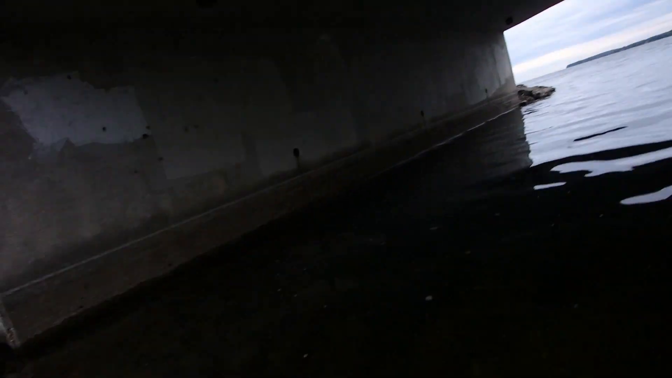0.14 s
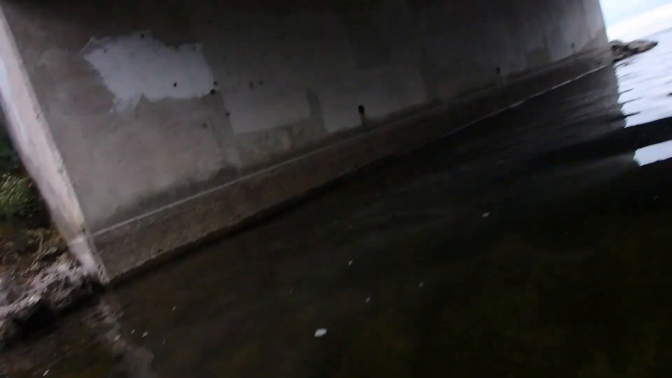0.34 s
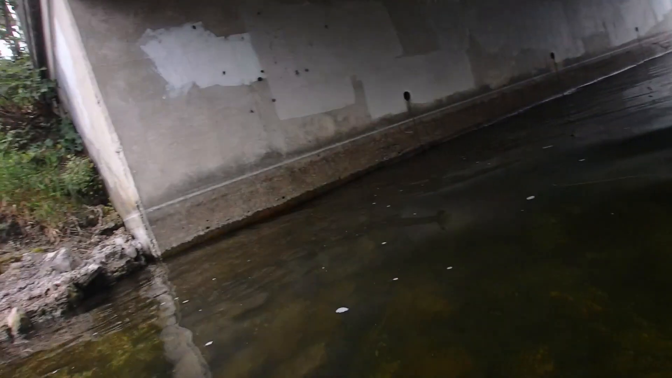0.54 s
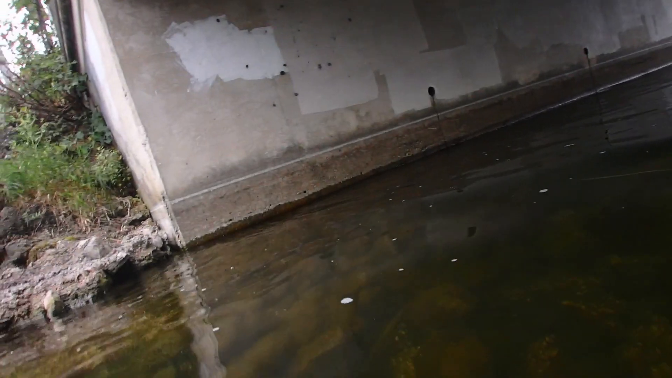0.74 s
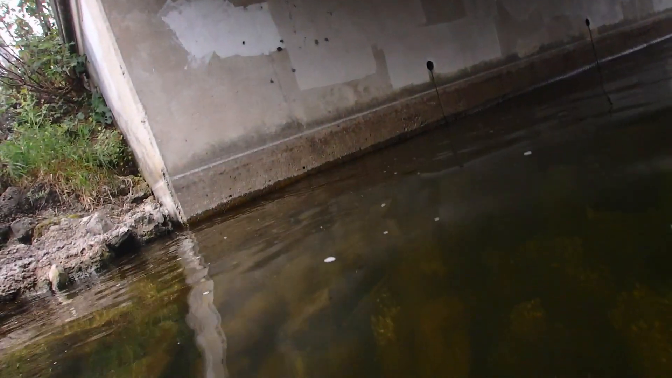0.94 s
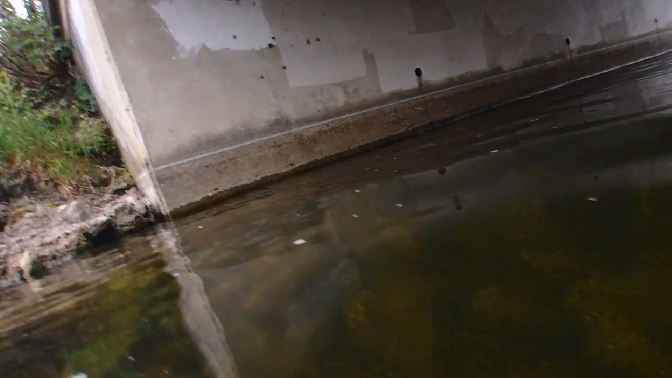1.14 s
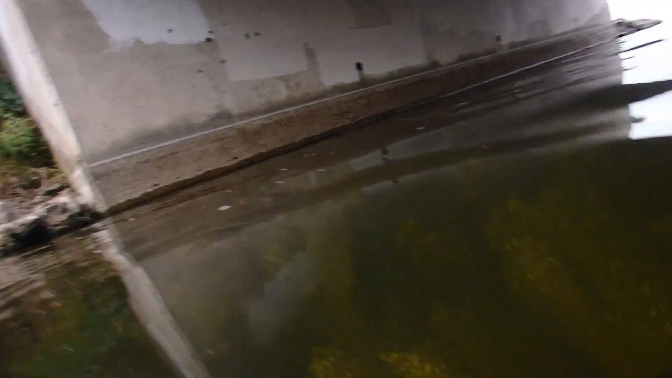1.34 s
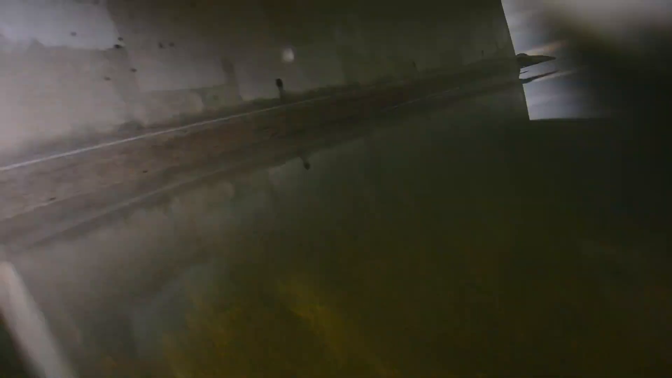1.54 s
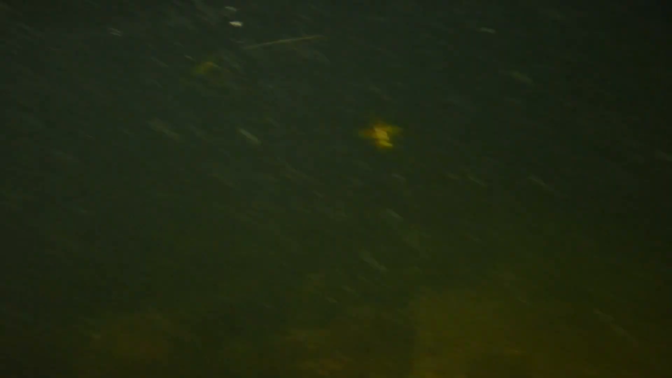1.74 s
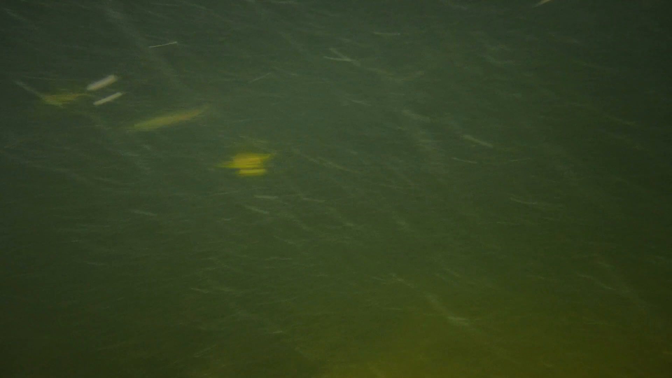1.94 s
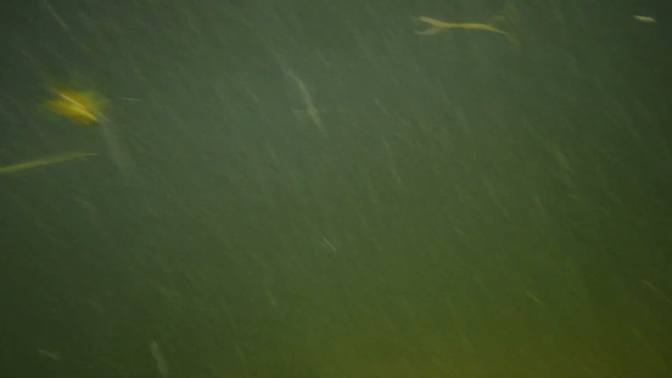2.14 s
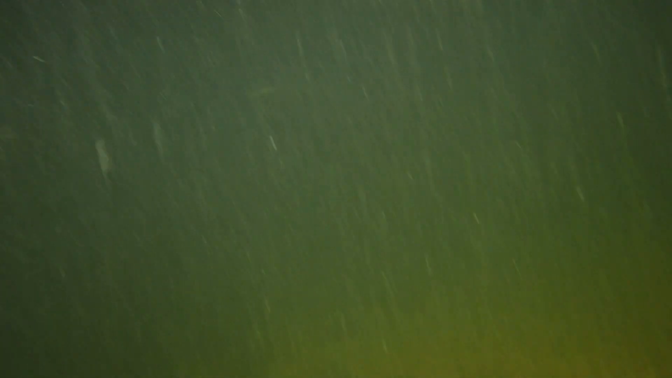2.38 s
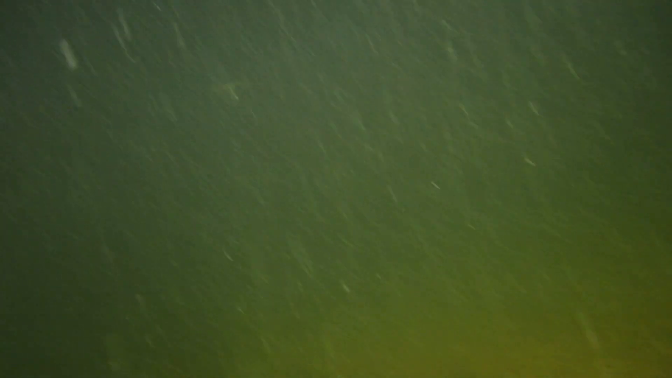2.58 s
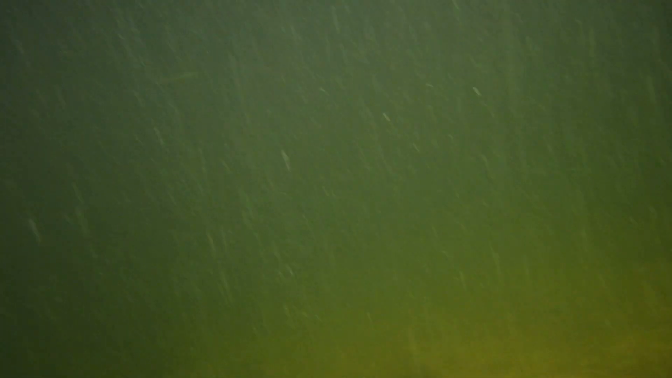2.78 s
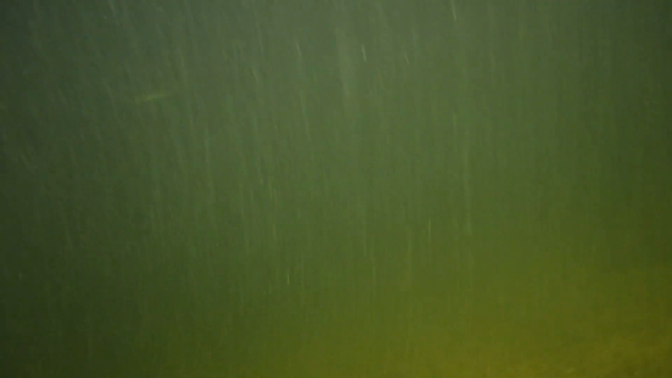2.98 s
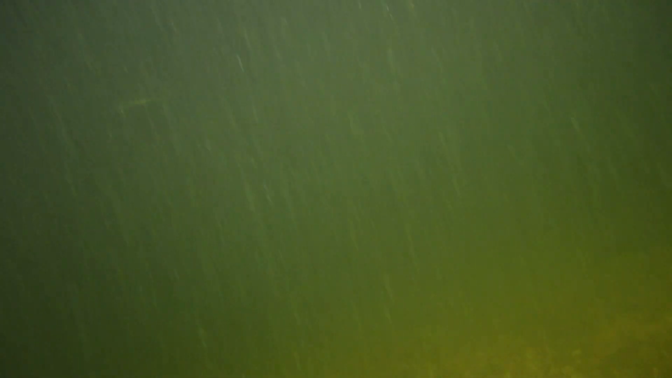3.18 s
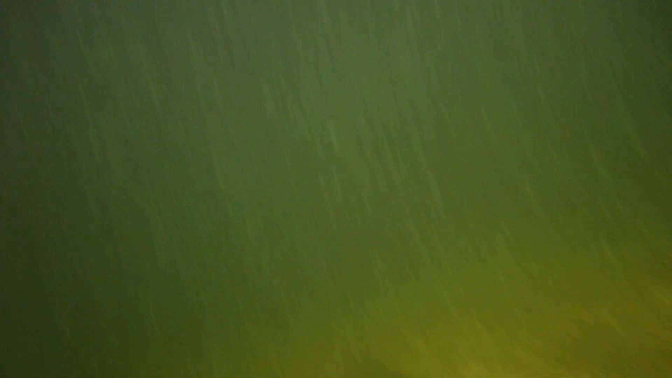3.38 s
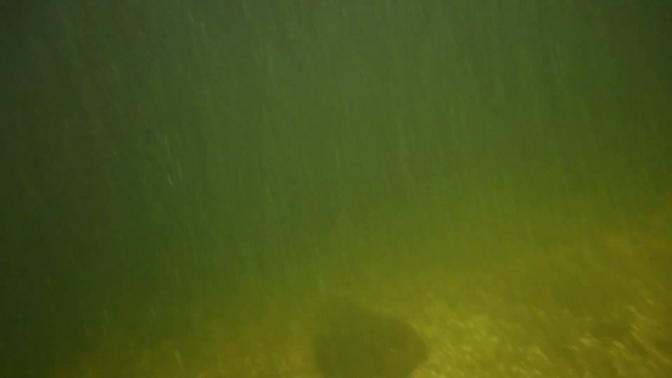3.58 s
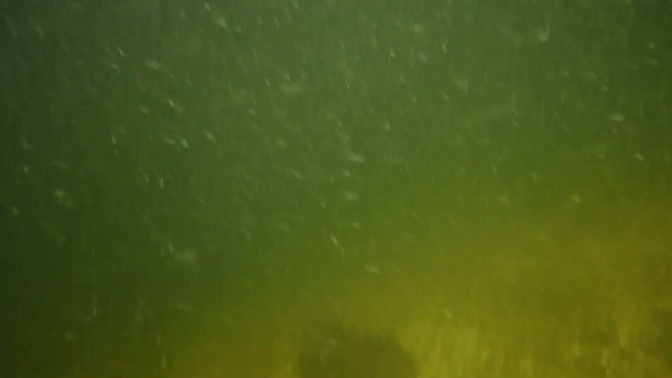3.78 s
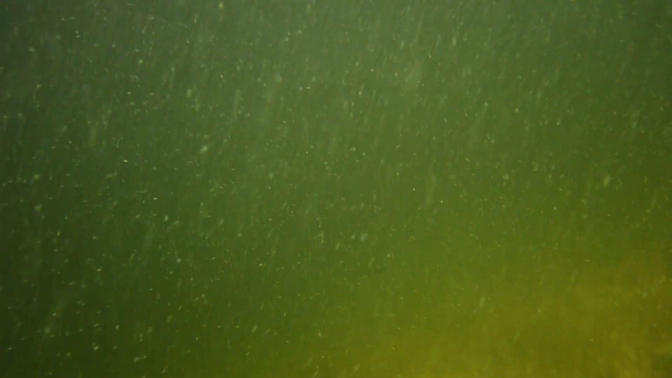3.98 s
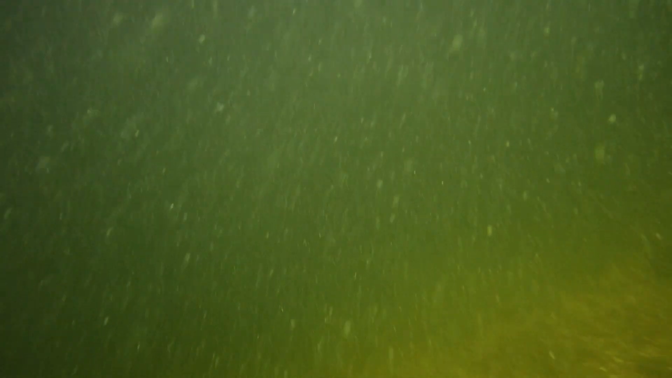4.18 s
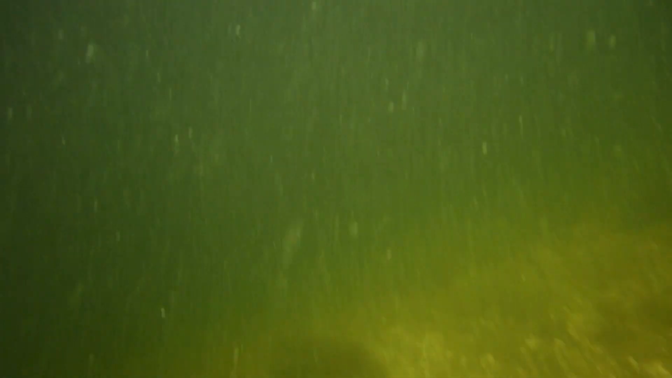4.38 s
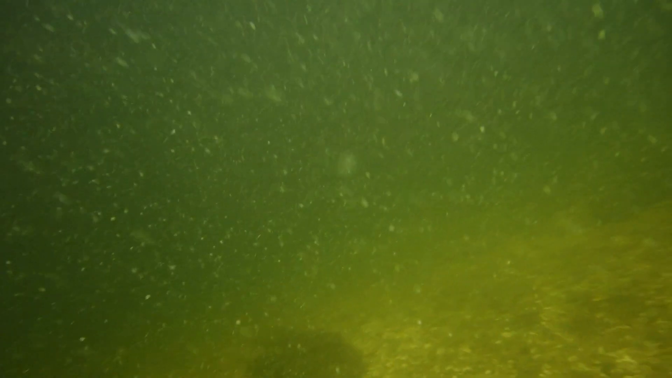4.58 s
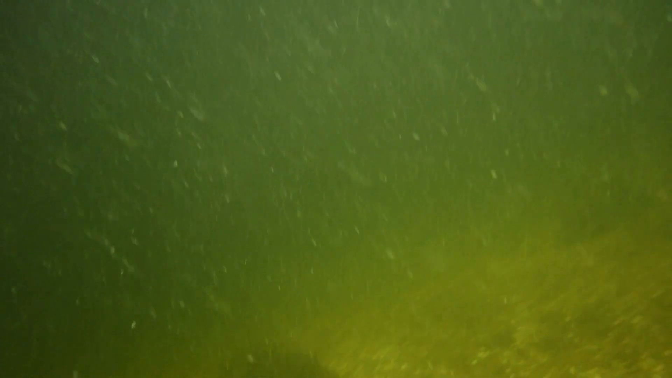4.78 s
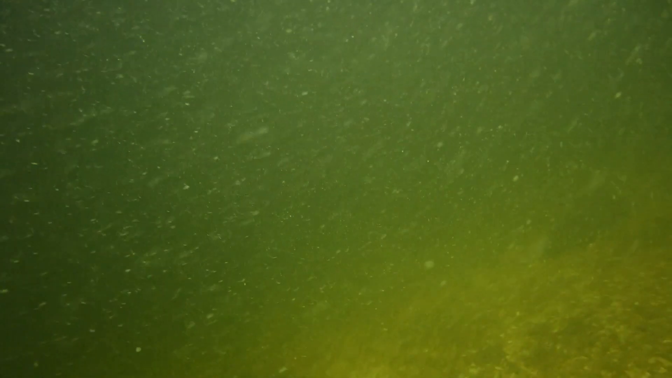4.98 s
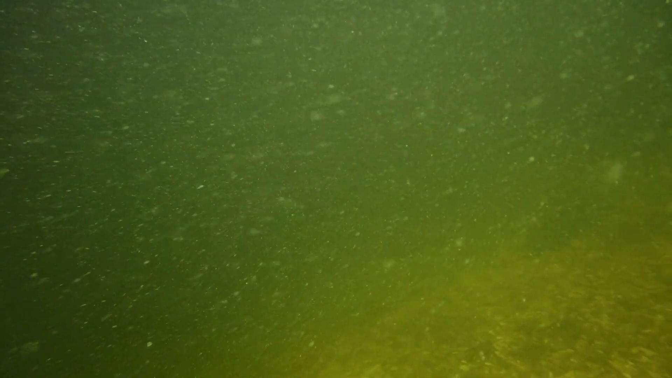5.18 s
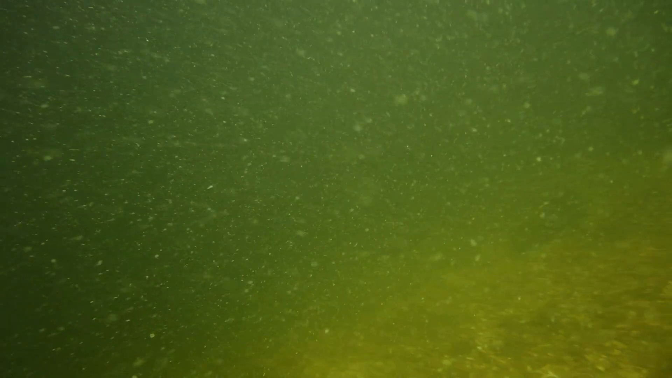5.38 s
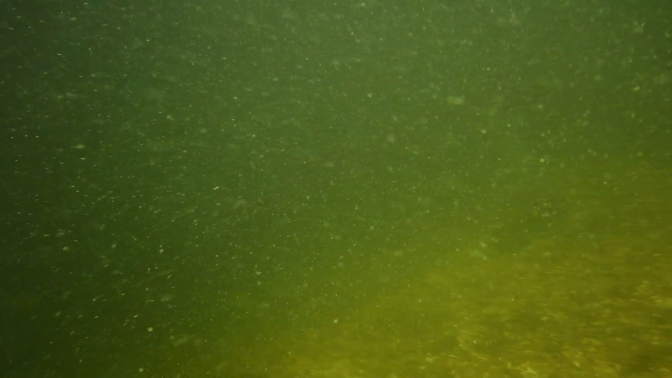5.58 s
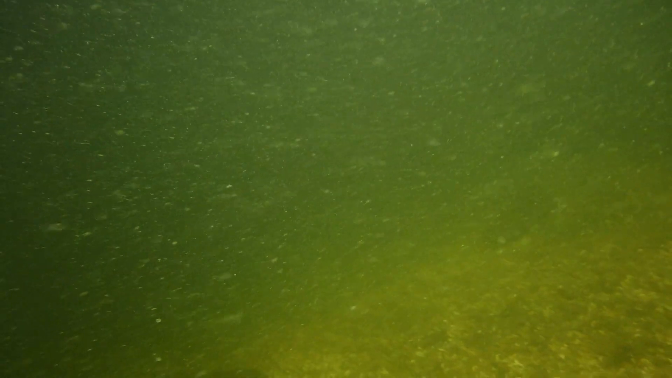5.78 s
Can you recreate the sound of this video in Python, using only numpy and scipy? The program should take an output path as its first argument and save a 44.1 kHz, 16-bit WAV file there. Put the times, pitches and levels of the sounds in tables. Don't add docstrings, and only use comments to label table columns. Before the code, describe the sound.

A small handheld camera over a lake beneath a bridge catches low wind thumps on both microphones, faint shore hiss, a few drips and two tiny insect chirps. It plunges in with hissing spray, hard slaps, snaps and a rising gulp. Underwater, muffled bubbles blub mostly on the left, with soft groans, ticks and plinks.

```python
import sys
import numpy as np
from scipy import signal
from scipy.fft import rfft, irfft, next_fast_len
from scipy.io import wavfile
from scipy.ndimage import uniform_filter1d, map_coordinates

SR = 44100
rng = np.random.default_rng(int(sys.argv[2]) if len(sys.argv) > 2 else 0)


def put_to_file(sound):
    columns = np.atleast_2d(sound).T
    safe = np.clip(columns, -1, 1)
    whole_steps = np.round(safe * 32767)
    wavfile.write(sys.argv[1], SR, whole_steps.astype(np.int16))


def linear_from_db(decibels):
    return 10 ** (np.asarray(decibels, float) / 20)


N = 257103
TIME = np.arange(N) / SR

# (time [s], gain [dB], gurgle level [dB], left over right [dB])
GAIN = [
    (1.853, 7.5, -38.5, 4.5),
    (2.2, -0.5, -34, 1.5),
    (2.7, 4, -36.5, 1),
    (3.2, 7, -39, 1),
    (3.7, 14.5, -39.5, 6.5),
    (4.3, 18.5, -38.5, 4),
    (4.9, 24, -40, 6),
    (5.55, 26, -35.5, 9.5),
    (5.83, 21, -40, 6),
]


def unit(x):
    return x / np.sqrt(np.mean(x ** 2) + 1e-20)


def curves(rows):
    s, *columns = np.transpose(rows)
    gate = uniform_filter1d(1. * ((TIME >= s[0]) & (TIME <= s[-1])), size=60)
    return [np.interp(TIME, s, column) for column in columns] + [gate]


def sides(pan_db):
    left = 1 / (1 + linear_from_db(-2 * np.asarray(pan_db)))
    return np.sqrt(2 * np.array([left, 1 - left]))


def surges(rows, rest_db):
    power = linear_from_db(2 * rest_db)
    for s, half, db, *pan in rows:
        bell = np.exp(-((TIME - s) / half) ** 2)
        power = power + linear_from_db(2 * db) * np.outer(sides(sum(pan)) ** 2, bell)
    return np.sqrt(power)


def wobble(rate):
    knots = rng.standard_normal((2, 4000))
    return np.array([map_coordinates(k, [np.arange(N) * min(rate, 600) / SR]) for k in knots])


def filtered(x, response):
    m = next_fast_len(N + SR // 2)
    return irfft(rfft(x, m) * response(np.fft.rfftfreq(m, 1 / SR)), m)[..., :N]


def resonant(modes):
    def response(f):
        total = 0
        for k, (c, w, db) in enumerate(modes):
            total = total + (-1) ** k * linear_from_db(db) * 1j * f * w / (c * c - f * f + 1j * f * w + 1e-9)
        return total
    return response


def rush(spectrum, alike, lump_db, lump_rate):
    f, db = np.transpose(spectrum)
    a, b = rng.standard_normal((2, N))
    turn = np.arccos(np.clip(alike, -1, 1)) / 2
    pair = np.cos(turn) * a + np.sin(turn) * np.array([b, -b])
    lumps = wobble(lump_rate)
    pair = pair * linear_from_db(lump_db * (lumps + np.clip(alike, 0, 1) * lumps[::-1]))
    return unit(filtered(pair, lambda hz: linear_from_db(np.interp(np.log(hz + 1), np.log(f), db))))


def hiss(spectrum, alike):
    return rush(spectrum, alike, 0, 1)


def scrape(t60, alike):
    a, b, c = rng.standard_normal((3, 600))
    return (alike * a + (1 - alike) * np.array([b, c])) * linear_from_db(-60 * np.arange(600) / SR / t60)


def blip(hz, cycles, rise):
    turns = np.arange(2000) / SR * hz
    u = turns / max(cycles, .2)
    return -np.sin(2 * np.pi * turns * (1 + rise * np.minimum(u, 2))) * (u * np.exp(1 - u)) ** 1.73


def add(out, s, sound):
    at = round(s * SR)
    out[:, at:at + sound.shape[1]] += sound[:, :N - at]


def place(out, s, db, pan_db, sound):
    add(out, s, linear_from_db(db) * np.outer(sides(pan_db), sound))


def wind():
    # (frequency [Hz], level per Hz [dB])
    buffet = [(12, -45.5), (20, -9), (54, -1), (141, -0.5), (334, -9.5), (500, -33), (650, -46),
              (1100, -120)]
    whip = [(150, -37.5), (250, -1.5), (510, -7), (1610, -38.5), (2000, -62), (2600, -90.5), (4400, -120)]
    # (centre [s], half length [s], level [dB], left over right [dB])
    gusts = [(0, 0.14, -23, 5), (.33, 0.059, -16.5, 6), (.41, 0.036, -28, -10), (.55, 0.056, -28, -5),
             (.77, 0.15, -20, -11.5), (1.04, 0.052, -17, -5.5), (1.12, 0.018, -13, 2.5),
             (1.24, 0.055, -14, -1), (1.31, 0.032, -27, -9), (1.4, 0.086, -16.5, 2.5),
             (1.53, 0.087, -13, 6.5)]
    noise = rush(buffet, alike=0.29, lump_db=-1.5, lump_rate=35)
    noise += linear_from_db(-11) * rush(whip, alike=.1, lump_db=3.5, lump_rate=60)
    return surges(gusts, rest_db=-32) * noise


def shore():
    # (frequency [Hz], level per Hz [dB])
    air = [(590, -17.5), (1000, -3), (1400, -10), (1610, -9.5), (2010, -12), (2410, -13), (3010, -17.5),
           (3270, -6.5), (3980, -17), (4360, -13.5), (5200, -16.5), (5900, -12.5), (6500, -18), (9000, -20),
           (14600, -28.5), (16000, -33)]
    return linear_from_db(-50) * hiss(air, alike=0.61)


def finger_brush():
    # (start [s], length [s], level [dB])
    rustle = (0.0069, 0.042, -38.5)
    start, length, db = rustle
    spectrum = [(1000, -2.5), (2500, -6.0), (3500, 2.5), (6000, -11), (8000, -19), (12000, -87)]
    swell = np.exp(-((TIME - start - length / 2) / (length / 2)) ** 4)
    return linear_from_db(db) * swell * rush(spectrum, alike=0.8, lump_db=4.5, lump_rate=190)


def eddies():
    # (time [s], peak [dB], pitch [Hz], left over right [dB])
    bumps = [
        (0.291, 0, 89, 11),
        (0.877, -14, 374, -17),
        (1.034, -5, 296, -12),
        (1.233, -7, 109, -19),
        (1.485, -4.5, 340, 4),
    ]
    out = np.zeros((2, N))
    for s, db, hz, pan_db in bumps:
        place(out, s, db, pan_db, blip(hz, 0.33, rise=-0.017))
    return out


def drops():
    # (time [s], peak [dB], pitch [Hz], left over right [dB], length [cycles])
    falls = [
        (.661, -37.5, 5650, -8, 2.3),
        (.78, -37, 1600, 2, 2.8),
        (.857, -40, 3400, 0, 4.3),
        (.862, -29, 7500, -8.5, 1.6),
        (.924, -41, 2450, -1, 3.7),
    ]
    out = np.zeros((2, N))
    for s, db, hz, pan_db, cycles in falls:
        place(out, s, db, pan_db, blip(hz, cycles, rise=0.016))
    return out


def insect():
    # (time [s], length [s], start pitch [Hz], end pitch [Hz], level [dB])
    chirps = [
        (1.057, 0.06, 6300, 7000, -54),
        (1.23, 0.072, 6650, 7290, -50),
    ]
    out = np.zeros((2, N))
    for s, length, from_hz, to_hz, db in chirps:
        u = np.arange(int(length * SR)) / (length * SR)
        hz = to_hz + (from_hz - to_hz) * np.exp(-3.5 * u) + 70 * wobble(450)[0, :len(u)]
        flutter = 1 + 0.37 * np.cos(2 * np.pi * 40 * u * length - 1.2)
        tone = np.sin(2 * np.pi * np.cumsum(hz) / SR)
        add(out, s, sides(-7)[:, None] * linear_from_db(db) * np.sin(np.pi * u) ** 0.57 * flutter * tone)
    return out


def above():
    ports_dry = uniform_filter1d(1. * (np.arange(N) < 1.61 * SR), size=400)
    return ports_dry * (wind() + shore()) + finger_brush() + eddies() + drops() + insect()


def churn_and_spray():
    # (time [s], churn level [dB], left over right [dB])
    entry = [
        (1.603, -36, 16),
        (1.622, -19.5, 6),
        (1.65, -10.5, -3),
        (1.668, -25, 0),
        (1.776, -30, -4),
        (1.79, -11, 7),
        (1.796, -35, 3),
        (1.802, -44, 5),
        (1.804, -18.5, 12),
        (1.8195, -14.5, 13),
    ]
    # (frequency [Hz], level per Hz [dB])
    churn_spectrum = [(30, -20), (100, -2.5), (500, -18), (1100, -17), (2400, -35.5), (3300, -36.5),
                      (4400, -50), (8000, -70.5), (14000, -100)]
    spray_spectrum = [(500, -3), (1500, -6), (2800, -4.5), (6500, -9), (10600, -19.5), (16000, -30.5)]
    churn_db, pan_db, gate = curves(entry)
    peak_s, wetted_s = 1.61, 1.656
    spray_db = -24.5 - 20 * np.maximum(peak_s - TIME, 0) / 0.0029
    spray_db -= 400.5 * np.clip(TIME - peak_s, 0, wetted_s - peak_s)
    spray_db += -28.5 * (TIME > wetted_s)
    churn = linear_from_db(churn_db) * sides(pan_db) * rush(churn_spectrum, alike=.2, lump_db=5.5, lump_rate=200)
    spray = linear_from_db(spray_db) * rush(spray_spectrum, alike=.4, lump_db=6, lump_rate=300)
    return gate * (churn + spray)


def slaps():
    # (time [s], peak [dB], pitch [Hz], left over right [dB], length [cycles])
    hits = [(1.6448, -5, 570, 5.5, 1.3), (1.6555, -10, 165, 2, 1.26), (1.6792, -4.5, 440, 2, 1.2),
            (1.7236, -16, 403, -13, 1.3), (1.7408, -8, 350, -1, 1.5), (1.6843, -21, 450, 0, 1.3),
            (1.693, -22, 1000, 3, 1.8), (1.693, -40.5, 3300, 2, 4.5), (1.723, -20, 1980, -11.5, 2.2),
            (1.733, -18, 980, -3.5, 2.6), (1.7588, -28, 2430, 0, 3.5), (1.7728, -26, 1500, 1, 2),
            (1.699, -23, 86, 2.5, 2.1), (1.748, -22, 95, 2, 1.5), (1.604, -16.5, 160, 6.5, 0.98),
            (1.7795, -13, 1354, 5.5, 3), (1.7845, -11, 1200, 21.5, 5), (1.8025, -11, 700, 18, 0.8),
            (1.8129, -7, 761, 23, 1.1), (1.8318, -3.5, 810, 19, 0.4)]
    out = np.zeros((2, N))
    for s, db, hz, pan_db, cycles in hits:
        place(out, s, db + 1.5, pan_db, blip(hz, .52 * cycles, rise=-.18))
    return out


def film_snaps():
    # (time [s], peak [dB])
    tears = [(1.6095, -1), (1.6173, -15.5), (1.6236, -26), (1.6274, -18.5), (1.6503, -25), (1.6614, -28),
             (1.6895, -34.5), (1.7428, -41), (1.7537, -41.5), (1.787, -28.5), (1.8035, -37.5),
             (1.8140, -31), (1.8192, -26), (1.8254, -46.5), (1.8318, -24.5)]
    snaps = np.zeros((2, N))
    onset = np.minimum(np.arange(600) / 45, 1)
    for s, db in tears:
        add(snaps, s, linear_from_db(db - 1) * sides(3)[:, None] * scrape(t60=.007, alike=.4) * onset * 1.5)
    return filtered(snaps, resonant([(10300, 2800, -4), (6500, 1300, 1), (3500, 2600, -7)]))


def gulp():
    # (start [s], length [s], start pitch [Hz], end pitch [Hz], level [dB], change over its length [dB])
    quickening = (1.6232, .022, 230, 1150, -5, -9)
    s, length, from_hz, to_hz, db, fade_db = quickening
    out = np.zeros((2, N))
    u = np.arange(int(length * SR)) / (length * SR)
    turns = np.cumsum(from_hz * (to_hz / from_hz) ** (u ** 1.3)) / SR
    saw = uniform_filter1d(turns % 1 * 2 - 1, size=14, mode="constant")
    add(out, s, sides(14 - 22 * u) * linear_from_db(db + fade_db * u) * saw * np.minimum(1, 8 * (1 - u)))
    return out


def port_seals():
    # (time [s], level [dB], left over right [dB], push 1 or pull -1)
    steps = [
        (1.791, -4.5, -26, -1),
        (2, -7, 24, -1),
        (1.8185, 0, 25, 1),
        (1.8247, -1, -20, 1),
        (1.8326, -12, 24, 1),
    ]
    out, t = np.zeros((2, N)), np.arange(900) / SR
    settling = np.exp(-t / 0.0018) * np.cos(2 * np.pi * 124 * t) * (1 - np.exp(-t / 0.00023)) ** 2
    for s, db, pan_db, sign in steps:
        place(out, s, db, pan_db, np.sign(sign) * settling)
    return out


def groan():
    # (frequency [Hz], level per Hz [dB])
    groan_spectrum = [(70, 9), (100, 8.5), (120, 19), (138, 14.5), (152, 5.5), (200, -56)]
    sway_spectrum = [(15, 7.5), (30, 9), (60, 7.5), (100, 9.5), (200, -64)]
    # (centre [s], half length [s], level [dB])
    swings = [(1.86, 0.053, -40.5), (2.3, 0.056, -42.5), (2.58, 0.035, -33), (2.81, 0.045, -29.5),
              (2.93, .04, -42), (3.0, 0.18, -46), (3.3, 0.06, -34.5), (3.55, 0.1, -33.5), (3.98, 0.09, -30),
              (4.41, 0.045, -28.5), (5.77, 0.038, -44)]
    # (centre [s], half length [s], level [dB], pitch [Hz], glide [Hz/s])
    moans = [
        (3.3, 0.066, -30.5, 117.2, -120),
        (3.601, .07, -33.5, 121.6, -200),
        (3.98, 0.064, -24, 122.5, -29),
        (4.082, 0.047, -30.5, 81, 58),
        (4.4, 0.046, -28, 125, 20),
        (4.39, 0.046, -31, 78.5, 300),
    ]
    rest_db = -45.5
    swing = surges(swings, rest_db)
    smeared = uniform_filter1d(swing, SR) / linear_from_db(rest_db)
    sway = linear_from_db(-47.5 + 0.2 * curves(GAIN)[0]) * smeared ** 0.82
    low = swing * hiss(groan_spectrum, alike=0.96)
    low += sway * rush(sway_spectrum, alike=0.96, lump_db=3.5, lump_rate=10)
    for s, half, db, hz, glide in moans:
        t = TIME - s
        low += linear_from_db(db) * np.exp(-(t / half) ** 2 / 2) * np.sin(2 * np.pi * t * (hz + glide * t / 2))
    return low


def water_rush():
    # (frequency [Hz], level per Hz [dB])
    flow_spectrum = [(400, -10.5), (700, -0.5), (920, -8.5), (1080, -3.5), (1400, -14), (1650, -6.5),
                     (1850, -5.5), (2150, -13.5), (2500, -19), (2850, -31.5), (3270, -22.5), (4300, -35),
                     (5300, -47), (8000, -79), (12000, -110)]
    cavity_whine = [(900, -43.5), (1040, -2.5), (1080, 4.5), (1120, -0.5), (1300, -48)]
    gain_db, _, pan_db, _ = curves(GAIN)
    flow = rush(flow_spectrum, alike=0.46, lump_db=2.3, lump_rate=150)
    flow += 0.5 * sides(5.2)[:, None] * rush(cavity_whine, alike=0.091, lump_db=1.0, lump_rate=33)
    return flow * linear_from_db(-59 + gain_db) * sides(0.91 * pan_db)


def circuit_hiss():
    # (frequency [Hz], level per Hz [dB])
    circuit = [(2940, -29), (5000, -2.5), (6100, -16), (8380, -7), (13500, -5), (16000, -17.5)]
    lift_db = np.maximum(curves(GAIN)[0], 1.5) * (TIME > 2)
    return linear_from_db(-87.5 + lift_db) * hiss(circuit, alike=0.21)


def froth(count):
    out = np.zeros((2, N))
    for when, pitch, life, size, side in rng.random((count, 5)):
        lowest_hz = 170 if side < .4 else 285
        swing = blip(lowest_hz * 2.25 ** pitch, .5 + 0.72 * life, rise=0.036)
        place(out, 1.86 + 3.97 * when ** 1.5, -4 * np.log(size + 0.069), 24 * (side - .5), swing)
    return unit(out)


def gurgle():
    # (frequency [Hz], level per Hz [dB])
    gurgle_spectrum = [(70, -42), (130, 6.5), (430, -5), (900, -13), (1700, -26), (3200, -35.5),
                       (5000, -64), (8000, -110)]
    _, gurgle_db, pan_db, _ = curves(GAIN)
    mixed = .75 * rush(gurgle_spectrum, alike=.3, lump_db=5.5, lump_rate=90) + 0.56 * froth(count=520)
    return linear_from_db(gurgle_db) * sides(0.75 * pan_db) * mixed


def water():
    submerged = curves(GAIN)[-1]
    return submerged * (groan() + water_rush() + circuit_hiss() + gurgle())


def bubbles():
    # (time [s], peak [dB], pitch [Hz], left
    # over right [dB], length [cycles])
    air_bubbles = [(1.857, -22, 414, 11.5, 0.87), (1.886, -15.5, 328, 26, 0.38), (2.054, -17, 430, 20, 0.51),
                   (2.1, -11, 352, 15.5, 0.58), (2.2, -21, 320.1, 0, 0.75), (2.228, -23.5, 367, 16.5, 0.8),
                   (2.29, -24, 504, 19, 2.8), (2.403, -19, 385, 5, 1), (2.42, -23, 429, 15, 2),
                   (2.461, -20, 370, 5, 1), (2.495, -16.5, 587, -18, 1.17), (2.549, -22, 435, 3.5, 1.9),
                   (2.578, -22.5, 436, -14, 1.35), (2.647, -20, 448.5, 11, 4.4), (2.744, -19, 417, 6, 2),
                   (2.778, -22.5, 460, 6.5, 2), (2.846, -15, 410, 5.5, 1.17), (2.901, -18.5, 464, 11, 2),
                   (2.9161, -18.5, 408, -3, 1.05), (2.888, -23, 476, 4, 1), (2.923, -20.5, 434, 3.5, 1.14),
                   (2.95, -17.5, 395, 3, 1.35),
                   (3.0465, -17, 400, 2, 1.76), (3.068, -26, 520, 7, 2.1), (3.096, -17, 340, -14, 3),
              (3.1655, -16.5, 356, 7, 1.3), (3.3452, -16, 320, 1, 0.68), (3.445, -17, 600, 24, 0.65),
              (3.491, -24.5, 383, 7, 2.4), (3.563, -16.5, 582, 16, 1.4), (3.59, -24, 557, 22, 1.5),
              (3.711, -15, 479, 7, 1.34), (3.754, -17, 342, 5.5, 1.25), (4.021, -20, 302.7, -11, 2.1),
              (4.048, -13.5, 347, 10, 0.53), (4.259, -9.5, 395, 7, 0.81), (4.508, -10.5, 404, 7, 0.88),
              (4.838, -6.5, 405, 7, 0.72), (5.568, -5, 624, 30, 0.78), (5.737, -14.5, 420, -1, 1.46),
              (5.749, -6, 372, 13, 0.88), (5.76, -11.5, 510, 9, 1),
                   (1.919, -26.5, 570, -5, 1.5), (1.963, -31, 329, 18, 0.93), (2.015, -25, 380, 9, 1.1),
             (2.16, -25.5, 450, 10, 1.5), (2.238, -22, 300, -0.5, 0.96), (2.259, -25.5, 240, 1, 1.1),
             (2.336, -33, 600, 8, 1.6), (2.356, -23.5, 418, 4.5, 1.36), (2.37, -27, 520, 4, 2),
             (2.62, -35, 550, 9, 1.25), (2.707, -36, 520, 8, 1.2), (2.8045, -24, 380, 7, 1.14),
             (3.148, -22, 452, -1, 0.73), (3.242, -34, 558, 9, 1.3), (3.263, -29, 500, 6, 1.1),
             (3.318, -23.5, 354, 4, 1.6), (3.383, -28, 260, -3, 0.89), (3.53, -30.5, 700, 12, 1.5),
             (3.681, -30, 300, 4, 0.72), (3.819, -27.5, 750, 4, 1.5), (3.853, -27, 500, 8, 0.66),
             (3.995, -26, 700, 9, 0.9), (3.493, -22.5, 238, 1, 1.2), (3.56, -19.5, 270, 3, 0.8),
             (3.711, -17.5, 228, 5.5, 1.3), (5.751, -15, 212, 7, 2.1), (5.572, -13, 815, 20, 0.97)]
    # (time [s], peak [dB])
    seam_leak = [
        (4.572, -12.5),
        (4.774, -10),
        (4.927, -13),
        (5.038, -10.5),
        (5.141, -10),
        (5.239, -9.5),
        (5.338, -9.5),
        (5.442, -10.5),
        (5.548, -10),
        (5.652, -12.5),
    ]
    out, t = np.zeros((2, N)), np.arange(1800) / SR
    gain_db = curves(GAIN)[0]
    loose = [(*row, -32 + 0.3 * gain_db[round(row[0] * SR)]) for row in air_bubbles]
    leak = [(s, db, 510, 13.5, 1.61, -10.5) for s, db in seam_leak]
    for s, db, hz, pan_db, cycles, knock_db in loose + leak:
        left, right = linear_from_db(db + 3.5) * sides(pan_db)
        near = blip(hz, 0.5 * cycles, rise=0.026)
        far = blip(0.546 * hz, 0.75 * cycles, rise=0.036)
        pop = np.array([left * near, right * (0.64 * near + 0.48 * far)])
        add(out, s, pop)
        burble = rng.standard_normal((2, 1800)) * linear_from_db(-60 * t / 0.033) * (t > .004)
        add(out, s, linear_from_db(-6) * signal.fftconvolve(pop, burble / np.linalg.norm(burble[0]), axes=1))
        knock = blip(1780 + 60 * rng.standard_normal(), 2.4, rise=0)
        place(out, s + 0.00203, db + knock_db, 1.8, knock)
    return out


def specks():
    # (time [s], peak [dB], left over right [dB])
    pricks = [(1.8856, -58.5, 6), (1.9989, -57.5, -2.5), (2.0328, -66, -1), (2.0613, -63.5, 1.5),
              (2.2258, -63.5, -1), (2.2615, -65.5, -0.5), (2.2944, -67, -3), (2.3954, -65, -1),
              (2.4694, -66, -3), (2.51, -63.5, -2), (2.5674, -64.5, -1.5), (2.6508, -67.5, -0.5),
              (2.6854, -73, 1), (2.8883, -62, 0.5), (2.9008, -57, -1.0), (2.916, -58.5, 2),
              (3.0933, -60, -5), (3.2409, -54, -5.5), (3.3428, -55, -1), (3.5254, -57, 1),
              (3.8307, -50.5, 4), (3.8906, -54.5, -2.5), (5.5687, -53, 1.5), (5.7653, -47, 2)]
    clicks = np.zeros((2, N))
    for s, db, pan_db in pricks:
        add(clicks, s, linear_from_db(db + 9) * sides(pan_db)[:, None] * scrape(t60=.0035, alike=.8))
    return filtered(clicks, resonant([(8220, 7500, 0.5)]))


def housing_ticks():
    # (time [s], peak [dB])
    joint_ticks = [(1.921, -56), (1.9989, -56), (2.035, -47.5), (2.4726, -53), (2.6055, -54.5),
                   (2.7646, -52), (3.245, -50), (3.385, -55), (3.3427, -38.5), (3.7524, -40), (3.8237, -53),
                   (3.8651, -44.5), (4.19, -43.5), (4.8182, -38), (5.1602, -33), (5.2077, -39),
                   (5.2998, -29), (5.3438, -35), (5.4783, -31), (5.5139, -32), (5.5309, -32), (5.548, -31),
                   (5.5705, -25)]
    thin_ticks = [(1.954, -50.5), (2.2084, -49.5), (2.2265, -33), (2.262, -46), (2.291, -34), (2.357, -38),
                  (2.4465, -36), (2.4594, -33), (2.795, -43.5), (2.8214, -43), (2.773, -52), (2.412, -51),
                  (2.296, -42), (2.47, -45.5), (2.614, -56), (5.326, -41), (4.018, -44), (2.8886, -33),
                  (2.9012, -23.5), (2.9164, -29), (3.9232, -41.5), (4.251, -39.5), (4.4337, -31.5),
                  (4.8884, -32), (5.3984, -40), (5.488, -39), (5.523, -38), (5.718, -42), (5.732, -35.5),
                  (5.2992, -24)]
    thick_ticks = [
        (2.537, -56),
        (3.0945, -52),
        (3.4426, -68),
        (5.733, -49.5),
    ]
    # (centre [Hz], width [Hz], level [dB])
    thin_wall = [(3210, 100, 12), (4270, 800, -1), (5360, 2600, -38)]
    thick_wall = [(980, 650, 5.5), (1820, 530, 6.5), (2390, 210, 1)]
    thin, thick = np.zeros((2, N)), np.zeros((2, N))
    for rows, thick_db in [(thin_ticks, -9.5), (joint_ticks, 5.5), (thick_ticks, 24)]:
        for s, db in rows:
            scratch = linear_from_db(db) * (scrape(t60=0.005, alike=0.59) * 1.63 + 0.3 * scrape(t60=0.042, alike=0.5))
            add(thin, s, scratch)
            add(thick, s, linear_from_db(thick_db) * scratch)
    rings = linear_from_db(16.0) * filtered(thin, resonant(thin_wall))
    rings += linear_from_db(16.5) * filtered(thick, resonant(thick_wall))
    pan_db = curves(GAIN)[2]
    return sides(1.1 * pan_db) * filtered(rings, lambda hz: 1 / (1 + 1j * hz / 5200) ** 4)


def plinks():
    # (time [s], peak [dB], pitch [Hz], left over right [dB])
    tiny = [(1.999, -44, 1876, 6), (2.0552, -39, 1900, 12), (2.2112, -35, 1880, 3), (2.2613, -43, 1820, 2),
            (2.3224, -45, 1660, 6), (2.3915, -50, 1630, 1.5), (2.4204, -44, 1470, 1.0),
            (2.6419, -42.5, 1560, 3), (2.6888, -44, 1438, 2), (2.7654, -41, 1465, -1),
            (2.777, -38.5, 1200, -4), (2.7953, -36, 1560, 4), (2.8004, -39, 1620, 3),
            (2.829, -35.5, 1360, 0.0), (2.8414, -36, 1690, 0), (3.0462, -39, 1460, 1.5),
            (3.0694, -33.5, 1320, -11), (3.1496, -41, 1605, 4), (3.2655, -37, 1320, -1.0),
            (3.381, -33, 1860, 5.0), (3.4444, -27.5, 1500, 15), (3.5309, -35, 1480, 3.5),
            (3.7638, -34.5, 1730, 3.5), (3.8245, -30, 2140, -14), (4.0175, -28, 1930, -11),
            (4.0642, -29, 1670, 4), (4.4993, -23.5, 1660, 5.0), (4.6548, -27.5, 1640, 3.0),
            (5.7364, -20, 1510, 4.0), (5.7624, -26, 1866, 2.5),
            (2.227, -36.5, 2300, -0.5),
        (3.1, -40.5, 2500, -2),
        (2.8421, -40, 2600, 1),
        (2.7643, -48, 2200, 0),
        (2.773, -46.5, 2300, 0),
        (3.342, -37, 2640, -2),
        (3.241, -43, 2400, 4),
    ]
    out = np.zeros((2, N))
    for s, db, hz, pan_db in tiny:
        place(out, s, db - 0.5, pan_db, blip(hz, 2.5, rise=0.012))
    return out


def scene():
    surface = above() + churn_and_spray() + slaps() + film_snaps() + gulp() + port_seals()
    left, right = water() + bubbles() + specks() + housing_ticks() + plinks()
    return surface + np.array([np.roll(left, 2), right])


def low_pass(x):
    return signal.sosfilt(signal.butter(12, 16410, fs=SR, output="sos"), x)


def record(dry):
    # (centre [Hz], width [Hz])
    whine_notches = [(2040, 82), (3063, 72), (4095, 120), (5111, 210), (6132, 26)]

    def response(f):
        passed = 1. * (f < 15900)
        for c, w in whine_notches:
            passed = passed * (c * c - f * f) / (c * c - f * f + 1j * f * w)
        return passed

    x = filtered(dry, response)
    x = x / (1 + np.abs(x / .98) ** 6) ** (1 / 6)
    return low_pass(x)


dry = scene()
out = record(dry)
put_to_file(out)
```